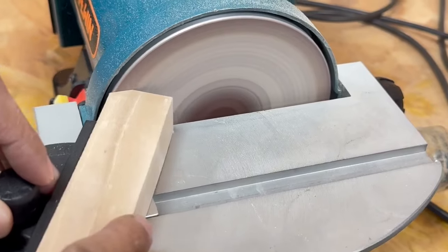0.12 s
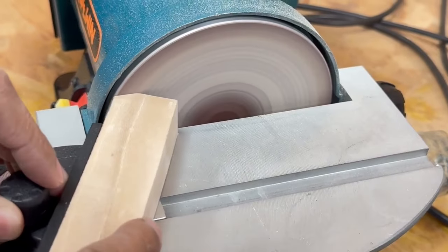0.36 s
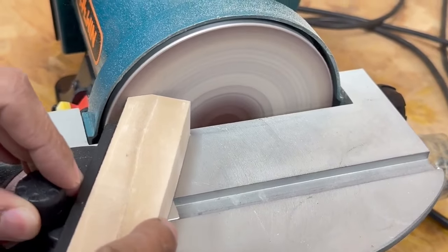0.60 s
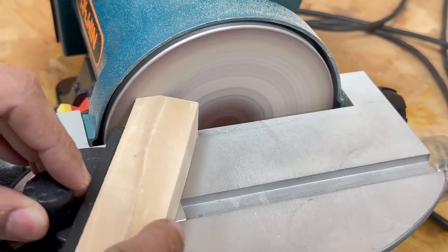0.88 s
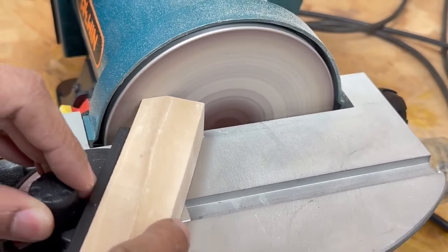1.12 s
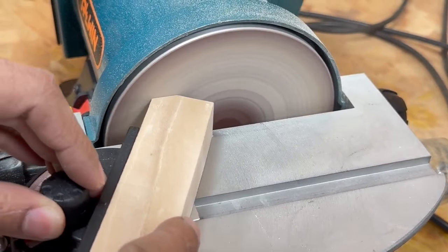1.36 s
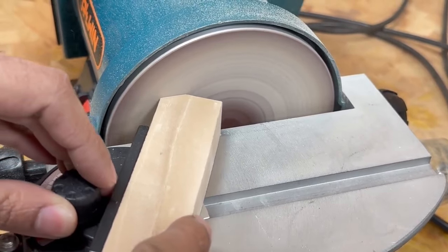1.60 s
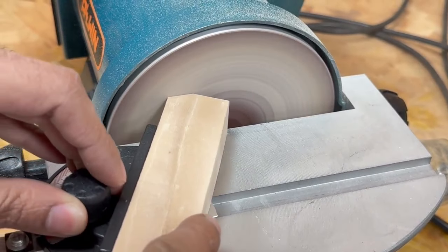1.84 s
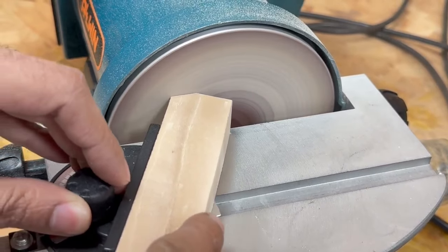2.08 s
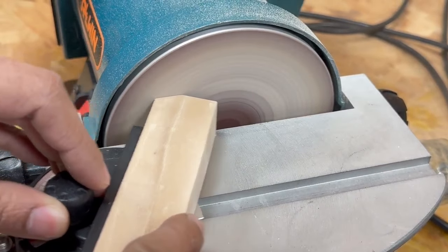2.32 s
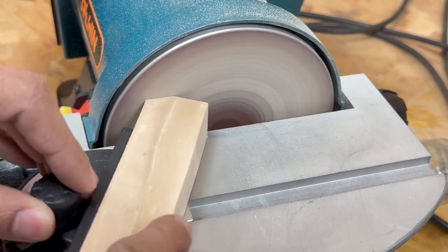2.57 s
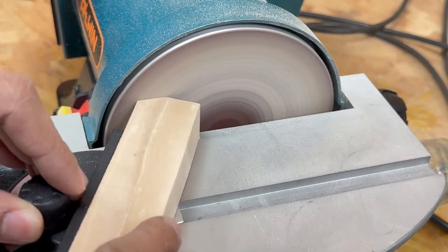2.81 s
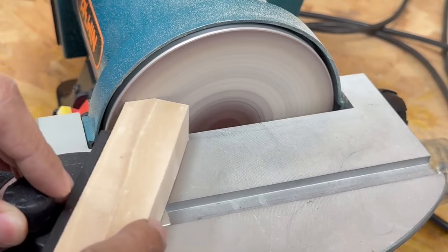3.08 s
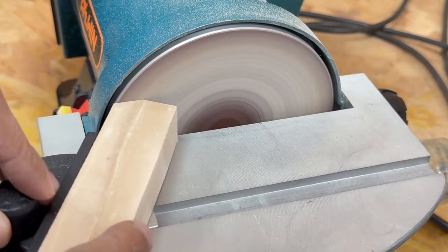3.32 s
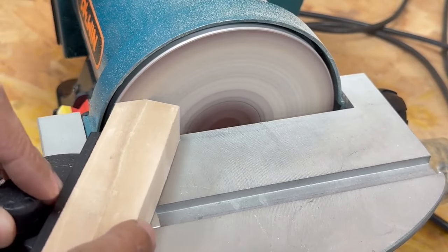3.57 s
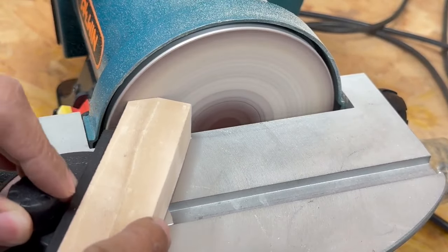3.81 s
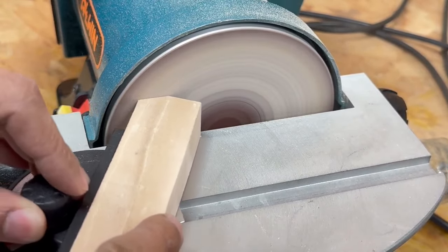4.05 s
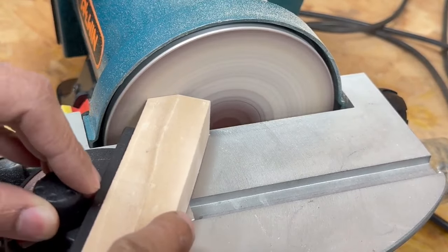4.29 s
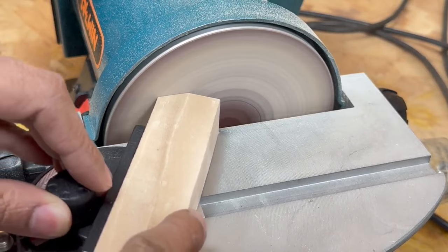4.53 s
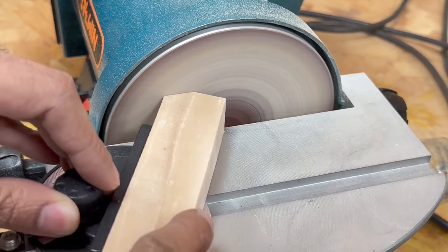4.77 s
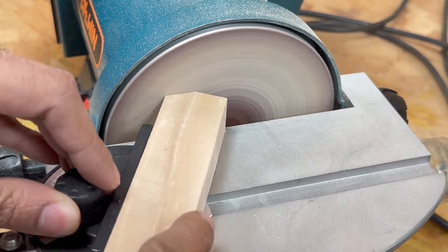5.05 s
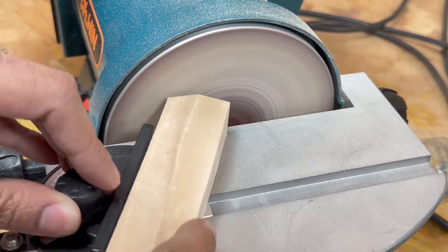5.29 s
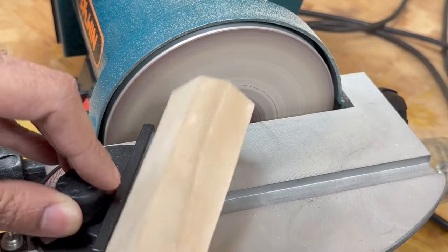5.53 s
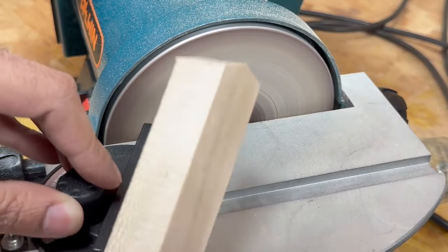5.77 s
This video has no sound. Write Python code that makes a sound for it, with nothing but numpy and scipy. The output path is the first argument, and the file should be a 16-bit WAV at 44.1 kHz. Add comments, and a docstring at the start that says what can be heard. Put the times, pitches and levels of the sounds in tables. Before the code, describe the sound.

A bench sander drones steadily near the microphone. Wood pressed on its disc makes a harsh buzzing rasp and sandy hiss, fluttering about fifty times a second. Small squeals cluster at the start and around three and a half seconds, as the motor sags slightly. The scraping fades quickly near five seconds, leaving hum and moving air with little room echo.

```python
"""In a workshop, a bench disc sander runs; a wooden block is swept twice across the spinning disc, then lifted away.
The motor hums as sine waves on multiples of the shaft rate, which sags under load. Fan and disc stir the air: filtered noise.
The grit is noise that partly repeats on each turn. It shakes the block, rasps and hisses, and throbs as high spots pass.
Once a turn the disc knocks the block on the table, whose modes ring and squeal, and a ridge of grit scratches its edge."""
import sys
import numpy as np
from scipy import signal
from scipy.fft import rfft, irfft, next_fast_len
from scipy.io import wavfile
from scipy.ndimage import uniform_filter1d

SR = 44100
rng = np.random.default_rng(int(sys.argv[2]) if len(sys.argv) > 2 else 0)


def natural_amplitude(level_db):
    """Convert a level in decibels to a linear amplitude factor, elementwise."""
    exponent = np.asarray(level_db, float) / 20
    return 10 ** exponent


def dump(signal):
    """Clip the signal to [-1, 1] and save it as 16-bit WAV at the path in sys.argv[1]."""
    limited = np.clip(np.atleast_2d(signal).T, -1, 1)
    pcm = np.round(limited * 32767).astype(np.int16)
    wavfile.write(sys.argv[1], SR, pcm)


N = 259749
# frequencies of the filters [Hz], raised by 1 so that the logarithm exists at the bottom
HZ = np.fft.rfftfreq(next_fast_len(N), 1 / SR) + 1

# how fast the shaft spins: (time [s], speed [turns per s])
SHAFT_SPEED = [(0.0, 49.496), (0.12, 48.688), (0.25, 47.795), (0.4, 47.743), (0.6, 47.374), (0.8, 47.435),
               (1.0, 47.497), (1.23, 47.762), (1.47, 48.183), (1.72, 48.345), (1.96, 48.604),
               (2.21, 48.955), (2.45, 48.683), (2.7, 48.813), (2.94, 48.812), (3.15, 48.833), (3.3, 49.068),
               (3.4, 48.578), (3.5, 47.79), (3.6, 47.303), (3.75, 47.096), (3.93, 47.221), (4.17, 47.551),
               (4.42, 47.938), (4.66, 48.098), (4.8, 48.328), (4.95, 49.026), (5.1, 49.468), (5.25, 49.544),
               (5.5, 49.48), (5.89, 49.617)]
# how hard the block bites: (time [s], bite [dB])
BITE = [(0.0, -2.5), (0.55, 0.2), (1.2, 0.5), (1.9, -4.5), (2.5, -0.4), (3.1, -4), (3.75, 0.9), (4.3, -1.2),
        (4.7, -3), (4.95, -11.5), (5.2, -27)]
# where the block meets the disc: (time [s], place [0 rim to 1 centre])
PLACE = [(0.0, 0.091), (.4, .05), (.9, 0.21), (1.4, 0.6), (1.9, 0.82), (2.7, 0.76), (3.1, 0.51),
         (3.8, 0.038), (4.03, 0.2), (4.15, 0.88), (4.4, 0.67), (4.72, 0.55), (4.86, 0.76), (5.1, 1)]
LIFT_END_S, LIFT_LENGTH_S = 5.15, .045   # the block leaves the disc

# fan and disc stirring the air: (frequency [Hz], noise density [dB, relative])
AIR_SHAPE = [(35, -36), (60, -15), (103, -12), (145, -17.5), (300, -17), (396, -13), (490, -14), (745, -12),
             (1250, -19), (1970, -18.5), (2700, -21), (3300, -19.5), (4690, -22), (6400, -19), (8600, -22),
             (15700, -25.5)]
AIR_DB = -28

# steady hum lines: (multiple of the shaft rate, idle level [dB], loaded level [dB])
HUM_LINES = [(1, -39, -39), (2, -49, -44.5), (3, -58, -46), (4, -51, -48), (7, -49, -49), (12, -50, -54)]
# hum lines that swell as the sagging speed carries them through a resonance of the frame:
# (multiple of the shaft rate, resonance [Hz], width [Hz], top level [dB], waver [dB])
SWELLING_LINES = [(9, 428.0, 26, -42.5, 3.0)]
# drone on 8 times the shaft rate, heard throughout: (time [s], level [dB])
DRONE = [(0, -35), (.3, -36), (.5, -35), (.9, -35), (1.2, -35.5), (1.5, -30), (1.7, -33.5), (2.1, -35.5),
         (2.35, -36), (2.7, -34.5), (2.9, -36.5), (3.9, -38.5), (4.1, -36), (4.7, -33), (4.9, -33),
         (5.1, -40), (5.89, -39.5)]
# whine on 16 times the shaft rate, while the load is heavy: (time [s], level [dB])
WHINE = [(0, -45), (.17, -50), (.28, -30.5), (.7, -32), (1.0, -33.5), (1.32, -31.5), (1.4, -39),
         (1.75, -66), (3.42, -60), (3.5, -30), (3.9, -34), (4.33, -32.5), (4.41, -37.5), (4.8, -39),
         (4.88, -57), (5.89, -50)]
# bearing tone, which fades when the load is heavy: (time [s], level [dB])
BEARING = [(0, -30), (.3, -34.5), (.55, -45), (.85, -35), (1.12, -44), (1.5, -31.5), (1.88, -39.5),
           (2.1, -29.5), (2.5, -32.5), (2.8, -28), (3.05, -33), (3.45, -29.5), (3.62, -40), (4.2, -45),
           (4.5, -34), (4.9, -39), (5.13, -31.5), (5.89, -29)]
BEARING_MULTIPLE = 1.79   # of the shaft rate

# modes of the work table: (frequency [Hz], width [Hz], grit over knock [dB])
TABLE_MODES = [(900, 110, -3), (1135, 75, -13), (1325, 30, -14), (1650, 90, -8), (1765, 100, -8),
               (1925, 110, -8)]
# steady ring of each table mode with the block at the centre: (level [dB])
TABLE_RING_DB = [-46, -46.5, -51, -47, -50, -50]
RIM_GAIN_DB, RING_WAVER_DB = 7.5, 1.0   # extra ring at the rim, and its waver
KNOCK_ANGLE_TURNS, KNOCK_JITTER_S = .89, .00003
# squeals, a mode singing out as the block slides: (start [s], length [s], mode [Hz], level [dB])
SQUEALS = [(0.0, 0.07, 1135, -34), (0.0, .06, 1650, -32), (.115, .1, 1650, -26), (.27, .03, 1650, -26),
           (.31, .04, 1650, -30), (.37, .08, 1650, -27), (.16, .06, 1850, -29), (.27, .03, 1850, -29),
           (.31, .05, 1850, -34), (.37, .08, 1850, -29.5), (.25, .35, 1135, -39), (.1, .3, 900, -35.5),
           (.45, .27, 1325, -41), (.5, .08, 1650, -28.5), (.58, .08, 1650, -32), (.79, .17, 1650, -36),
           (.9, .14, 1135, -38), (1.22, .19, 1135, -34.5), (1.75, .2, 1650, -39), (2.38, .15, 1135, -35.5),
           (2.9, .2, 1135, -38.5), (3.13, .05, 1650, -35), (3.24, .05, 1650, -34), (3.15, .21, 1135, -32.5),
           (3.22, .16, 1325, -37), (3.38, .09, 1650, -30.5), (3.47, .05, 1650, -33),
           (3.52, .16, 1650, -29.5), (3.38, .12, 1850, -34.5), (3.52, .05, 1850, -35),
           (3.58, .08, 1850, -31), (3.34, .16, 900, -35), (3.64, .13, 1325, -41), (3.88, .13, 1650, -35),
           (3.82, .18, 1135, -41), (4.02, .33, 1135, -35.5)]
SQUEAL_REACH = .05   # a squeal sounds every mode within this share of its pitch
SQUEAL_EDGE_S, SQUEAL_FADE_DB_PER_S = .03, 350

# the catch at the block's edge, at the rim: (peak level [dB], ring [Hz])
SNAG_RIM = (-18, 7300)
# the same at the centre: (peak level [dB], ring [Hz])
SNAG_CENTRE = (-13.5, 2480)
# how much the catch wavers: (level [dB], ring [Hz])
SNAG_WAVER = (0.32, 220)
SNAG_ANGLE_TURNS, SNAG_FOLLOWS = .38, .6   # the second in dB per dB of bite

# resonances of the block: (frequency [Hz], width [Hz], level [dB])
BODY_MODES = [(171, 120, -10.5), (428, 160, -5.5), (619, 48, -5.5), (726, 71, -1)]
# high spots of the disc, a lift below 0 dB adding nothing:
# (angle [turns], width [turns], rasp lift [dB], hiss lift [dB])
HIGH_SPOTS = [(0.17, 0.011, 3.5, 0.5), (.29, 0.081, 6, -4), (.38, 0.1, -3.5, 9.5), (.47, 0.018, 7.5, -5),
              (.88, 0.023, 3, 9)]
# colour of the rasp: (frequency [Hz], noise density [dB, relative])
RASP_SHAPE = [(1100, -3.5), (1900, -2.5), (2200, -7.5), (2600, -1), (4600, -0.5), (6300, 3.5), (7400, -15),
              (8500, -64), (11000, -47)]
# colour of the hiss: (frequency [Hz], noise density [dB, relative])
HISS_SHAPE = [(5000, -25), (6500, -9), (7500, -4), (9000, -4), (10500, -4), (12200, 0), (14000, -1.5),
              (15700, -1.5)]
# shaking of the block: (level at 0 dB bite [dB], change [dB per dB of bite], waver [dB])
BODY_LEVEL = (-38.5, 1, 2.3)
# rasp: (level at 0 dB bite [dB], change [dB per dB of bite], waver [dB])
RASP_LEVEL = (-28, 0.84, 0.48)
# hiss: (level at 0 dB bite [dB], change [dB per dB of bite], waver [dB])
HISS_LEVEL = (-20.5, 0.33, 0.43)
# the treble level dips briefly: (time of the lowest point [s], depth [dB], way back [s])
TREBLE_DIPS = [(1.07, 7, 0.053), (1.77, 4, .3), (2.24, 6, 0.094), (2.54, 6.5, 0.21), (2.85, 5, 0.058),
               (3.1, 6, 0.05), (4.09, 2, 0.59)]
DIP_FALL_S = .013
# the block's face rings under the grit: (frequency [Hz], width [Hz])
FACE_MODES = [(3650, 520), (4550, 650)]
# level of the face modes: (time [s], lower mode [dB], upper mode [dB])
FACE_DB = [(0, -48, -64), (.9, -54, -50), (1.3, -40, -37), (1.9, -46.5, -39), (2.6, -47, -50),
           (3.1, -55, -64), (3.9, -61, -56), (4.15, -38, -38), (4.38, -36, -37), (4.5, -54, -42),
           (4.72, -40, -32), (4.85, -38, -42), (5.0, -39, -54), (5.15, -48, -56)]
FACE_WANDER_HZ = 130   # the modes shift as the block slides

SMEAR_S = .01   # spread of the returns from the workshop
# difference between the two microphone ports: (frequency [Hz], side over mid [dB])
PORT_SIDE = [(40, -32), (130, -20), (380, -13), (700, -7), (1300, -13), (2400, -22), (3200, -10),
             (4600, -12.5), (5500, -17.5), (6800, -15.5), (7800, 6.5), (8600, -18), (11000, -21.5),
             (15000, -21)]
# balance of the two ports: (frequency [Hz], left over right [dB])
PORT_TILT = [(60, 0.0), (110, 0.0), (200, 1.0), (380, 3.5), (700, -1.5), (1290, 1.0), (2380, 0.0),
             (4400, 0.0), (8120, 0.0), (15000, 0.0)]
# a hole in the mid sound: (frequency [Hz], width [Hz], gain [dB])
MID_HOLE = (8000, 600, -8)
# moments when left and right differ more in the treble: (start [s], length [s])
STEREO_TIMES = [(1.01, .13), (1.19, .03), (1.78, .13), (2.19, .15), (2.38, .09), (2.52, .21), (2.85, .15),
                (3.08, .12), (4.08, .27)]
# colour of that left-right difference: (frequency [Hz], side over mid [dB])
STEREO_SHAPE = [(4500, -34), (5500, -28), (6500, -15), (7500, -24), (8700, -1.5), (15700, -4)]
TOP_HZ = 15780   # nothing is passed on above this


def rms_one(x):
    """Scale to an average strength (rms) of 1."""
    return x / np.sqrt(np.mean(x ** 2) + 1e-20)


def in_time(rows):
    """Draw each column of a table as a curve over all samples."""
    s, *columns = np.transpose(rows)
    t = np.arange(N) / SR
    return [np.interp(t, s, column) for column in columns]


def at_hz(points):
    """Draw a spectrum in dB over all filter frequencies, straight on a log scale."""
    hz, db = np.transpose(points)
    return np.interp(np.log(HZ), np.log(hz), db)


def shaped(x, gain):
    """Filter a sound by a gain for each frequency."""
    size = next_fast_len(N)
    return irfft(rfft(x, size) * gain, size)[..., :N]


def resonances(modes):
    """Gain of several resonances side by side, their powers added."""
    power = 0
    for hz, width, db in modes:
        power = power + natural_amplitude(db) ** 2 / (1 + (2 * (HZ - hz) / width) ** 2) ** 2
    return np.sqrt(power)


def peak_filter(centre_hz, width_hz):
    """Filter numbers of a resonance with gain 1 on top; a narrower one rings longer."""
    r = np.exp(-np.pi * width_hz / SR)
    b = [(1 - r * r) / 2, 0, (r * r - 1) / 2]
    a = [1, -2 * r * np.cos(2 * np.pi * centre_hz / SR), r * r]
    return b, a


def peak(x, centre_hz, width_hz):
    """Ring a sound through a fixed resonance."""
    b, a = peak_filter(centre_hz, width_hz)
    return signal.lfilter(b, a, x)


def moving_peak(x, centre_hz, width_hz):
    """Ring a sound through a resonance whose centre glides, stepped in short blocks."""
    out, state = np.zeros(N), np.zeros(2)
    for i in range(0, N, 512):
        b, a = peak_filter(centre_hz[i], width_hz)
        out[i:i + 512], state = signal.lfilter(b, a, x[i:i + 512], zi=state)
    return out


def drift(rate):
    """Slow random wandering of spread about 1, with `rate` new values a second."""
    knots = rng.standard_normal(int(N / SR * 100) + 2)
    return np.interp(np.arange(N) / SR * rate, np.arange(len(knots)), knots) * 1.2


def from_angle(turns, angle):
    """How far the disc is from an angle, from -0.5 to 0.5 turns."""
    return (turns - angle + .5) % 1 - .5


def grit(turns, repeat, wear, coarse_db):
    """Noise whose share `repeat` is the disc's surface, met again each turn and slowly wearing; the rest is new."""
    size = 1024   # surface points in one turn
    keep, repeat = np.clip(1 - wear, 0, .999), np.clip(repeat, 0, 1)
    rows = rng.standard_normal((340, size))
    # each row is one turn, mixed from the turn before and new noise; the first 40 only settle
    surface = signal.lfilter([1], [1, -keep], rows, axis=0)[40:].ravel()
    seen = rms_one(np.interp(turns * size, np.arange(len(surface)), surface))
    signs = rng.choice([-1, 1], N)
    fresh = signs * natural_amplitude(coarse_db * np.minimum(rng.exponential(1, N), 5))
    return np.sqrt(repeat) * seen + np.sqrt(1 - repeat) * rms_one(fresh)


def air(turns):
    """Broad whirr of fan and disc stirring the air: noise partly repeating with the shaft."""
    whirr = grit(turns, repeat=.24, wear=.11, coarse_db=3.0) * natural_amplitude(.25 * drift(10.0))
    return natural_amplitude(AIR_DB) * rms_one(shaped(whirr, natural_amplitude(at_hz(AIR_SHAPE))))


def motor(turns, speed, contact):
    """Unbalance and slots sing on whole multiples of the shaft rate, a bearing between them."""
    lines = []
    for multiple, hz, width, top_db, waver_db in SWELLING_LINES:
        below_top_db = 20 * np.log10(1 + (2 * (multiple * speed - hz) / width) ** 2)
        lines.append((multiple, top_db - below_top_db + waver_db * drift(7.6)))
    lines.append((8, in_time(DRONE)[0] + 1.2 * drift(11.0)))
    lines.append((BEARING_MULTIPLE, in_time(BEARING)[0]))
    lines.append((16, in_time(WHINE)[0] + 1.0 * drift(14.0)))
    for multiple, idle_db, loaded_db in HUM_LINES:
        lines.append((multiple, idle_db + contact * (loaded_db - idle_db)))
    hum = 0
    for multiple, db in lines:
        level = np.sqrt(2) * natural_amplitude(db + 1.0 * drift(2.84))   # rms to sine peak
        phase = 2 * np.pi * (multiple * turns + rng.random()) + .41 * drift(13.0)
        hum = hum + level * np.sin(phase)
    return hum


def singing(hz, steady_db):
    """Level of one table mode: its steady ring, and each squeal rising, holding and dying over it."""
    t = np.arange(0, N + 64, 64) / SR
    power = 0 * t
    for start, length, mode_hz, db in SQUEALS:
        if abs(hz / mode_hz - 1) < SQUEAL_REACH:
            rise = np.clip((t - start) / SQUEAL_EDGE_S + .5, 0, 1)
            fade_db = SQUEAL_FADE_DB_PER_S * np.maximum(t - start - length, 0)
            power = power + (natural_amplitude(db - fade_db) * rise) ** 2
    return np.sqrt(natural_amplitude(steady_db) ** 2 + np.interp(np.arange(N) / SR, t, power))


def table(turns):
    """Once a turn the disc knocks the block on the table; knock and grit ring the table's modes."""
    laps = np.flatnonzero(np.diff(np.floor(turns - KNOCK_ANGLE_TURNS)))
    chance = rng.standard_normal((len(laps), 2))
    late = (chance[:, 0] * KNOCK_JITTER_S * SR).astype(int)
    knocks = np.zeros(N)
    knocks[np.clip(laps + late, 0, N - 1)] = natural_amplitude(1.5 * chance[:, 1])
    rubbing = grit(turns, repeat=.5, wear=.15, coarse_db=2.0)
    rim = 1 - in_time(PLACE)[0]
    out = 0
    for (hz, width, grit_db), ring_db in zip(TABLE_MODES, TABLE_RING_DB):
        drive = rms_one(knocks) + natural_amplitude(grit_db) * rubbing
        # twice through the mode: the heavy table swells into its ring instead of clicking
        ring = peak(peak(drive, hz, width), hz, width)
        # the ring holds its strength from turn to turn
        even = ring / np.sqrt(uniform_filter1d(ring ** 2, size=2800) + 1e-15)
        level = singing(hz, ring_db + RIM_GAIN_DB * rim) * natural_amplitude(RING_WAVER_DB * drift(12.0))
        out = out + level * even
    return out


def snag(turns):
    """The highest ridge of grit catches the block's edge: a short scratch, nearly the same on each turn."""
    place, = in_time(PLACE)
    peak_db, ring_hz = [rim + place * (centre - rim) + waver * drift(4.07)
                        for rim, centre, waver in zip(SNAG_RIM, SNAG_CENTRE, SNAG_WAVER)]
    off = from_angle(turns, SNAG_ANGLE_TURNS)
    # swells, then lets go at once
    burst = np.exp(-.5 * (off / np.where(off < 0, .018, .009)) ** 2)
    scratch = grit(turns, repeat=.8, wear=.1, coarse_db=1.0) * burst * natural_amplitude(.6 * drift(30.0))
    ringing = scratch + natural_amplitude(2.0) * moving_peak(scratch, ring_hz, 1500)
    band = signal.butter(2, [2200, 6800], "band", fs=SR, output="sos")
    coloured = signal.sosfilt(band, ringing)
    # every catch takes about the same bite: even the level over a few turns
    evened = coloured / np.sqrt(uniform_filter1d(coloured ** 2, size=3650) + 1e-12)
    level = natural_amplitude(peak_db + SNAG_FOLLOWS * in_time(BITE)[0])
    return level * evened * np.sqrt(np.mean(burst ** 2))


def throb(turns, column, wobble, uneven_db):
    """Pressure over one turn: each high spot adds power, a little early or late, harder or softer."""
    power = 1
    for angle, width, *lift_db in HIGH_SPOTS:
        off = from_angle(turns, angle + wobble * drift(1.65))
        extra = np.maximum(natural_amplitude(lift_db[column]) ** 2 - 1, 0) * natural_amplitude(uneven_db * drift(30.0)) ** 2
        power = power + extra * np.exp(-.5 * (off / width) ** 2)
    return np.sqrt(power)


def treble_dips():
    """Gain in dB for the brief dips of the treble: a quick fall and a straight way back, at set times."""
    t = np.arange(N) / SR
    return sum(np.interp(t, [s - DIP_FALL_S, s, s + back_s], [0, -depth_db, 0])
               for s, depth_db, back_s in TREBLE_DIPS)


def sanding(turns):
    """Grit shakes the block and rings its face, and rasps and hisses straight into the air."""
    bite_db, = in_time(BITE)
    body_db, rasp_db, hiss_db = [db + follows * bite_db + waver_db * drift(7.7)
                                 for db, follows, waver_db in (BODY_LEVEL, RASP_LEVEL, HISS_LEVEL)]
    shaking = grit(turns, repeat=.65, wear=.12, coarse_db=2.0)
    scrape = grit(turns, repeat=.25, wear=.3, coarse_db=2.0)
    scrape = scrape * throb(turns, column=0, wobble=.01, uneven_db=1.5)
    dust = grit(turns, repeat=0, wear=1, coarse_db=1.5)
    dust = dust * throb(turns, column=1, wobble=.015, uneven_db=1.5)
    layers = [(shaped(shaking, resonances(BODY_MODES)), body_db),
              (shaped(scrape, natural_amplitude(at_hz(RASP_SHAPE))), rasp_db),
              (shaped(dust, natural_amplitude(at_hz(HISS_SHAPE))), hiss_db + treble_dips())]
    for (hz, width), face_db in zip(FACE_MODES, in_time(FACE_DB)):
        gliding = moving_peak(scrape, hz + FACE_WANDER_HZ * drift(6.0), width)
        layers.append((peak(gliding, hz, 2 * width), face_db))
    return sum(natural_amplitude(db) * rms_one(layer) for layer, db in layers)


def scene():
    """One source close to the microphone; the workshop returns its noise smeared over a hundredth of a second."""
    speed, = in_time(SHAFT_SPEED)
    turns = np.cumsum(speed) / SR
    contact = np.clip((LIFT_END_S - np.arange(N) / SR) / LIFT_LENGTH_S, 0, 1)
    hum = motor(turns, speed, contact)
    noise = air(turns) + contact * (table(turns) + snag(turns) + sanding(turns))
    # each narrow band comes back with a delay of its own
    delay_s = SMEAR_S * rng.random(400)[(HZ / SR * 798).astype(int)]
    phase = 2 * np.pi * np.cumsum(delay_s) * (HZ[1] - HZ[0])
    scattered = shaped(noise, np.exp(-1j * phase))
    # the hum reaches the two ports equally loud but shifted in phase
    return np.array([hum + noise, shaped(hum, 1j) + scattered])


def band_limit(x):
    """A steep low-pass at the top of the band."""
    return signal.sosfilt(signal.butter(12, 16780, fs=SR, output="sos"), x)


def record(dry):
    """Two close ports pick up mid and side sound, with a tilt between left and right; the mid has a hole."""
    hz, width, db = MID_HOLE
    mid = shaped(dry[0], natural_amplitude(db / (1 + (2 * (HZ - hz) / width) ** 2)))
    side = shaped(dry[1], natural_amplitude(at_hz(PORT_SIDE)))
    t = np.arange(N) / SR
    stereo_on = sum((t > start) & (t < start + length) for start, length in STEREO_TIMES)
    stereo_on = uniform_filter1d(stereo_on * 1., size=400)   # soft edges
    side = side + stereo_on * shaped(dry[1], natural_amplitude(at_hz(STEREO_SHAPE)))
    tilt_db = at_hz(PORT_TILT) / 2
    gains = natural_amplitude(np.array([tilt_db, -tilt_db])) * (HZ < TOP_HZ)
    mix = shaped(np.array([mid + side, mid - side]), gains)
    return band_limit(mix)


dry = scene()
out = record(dry)
dump(out)
```